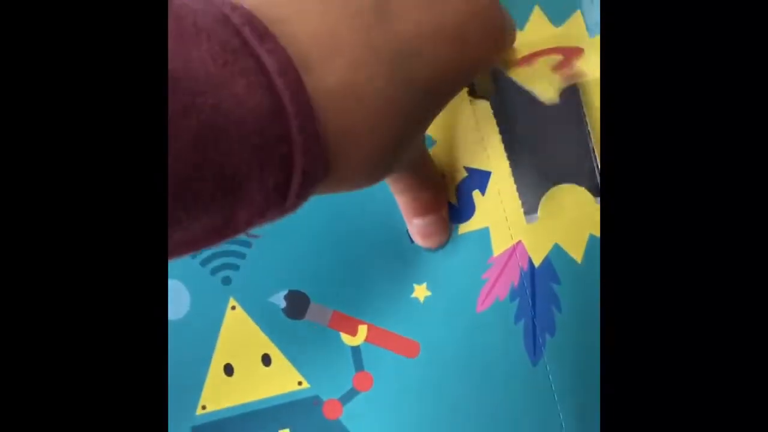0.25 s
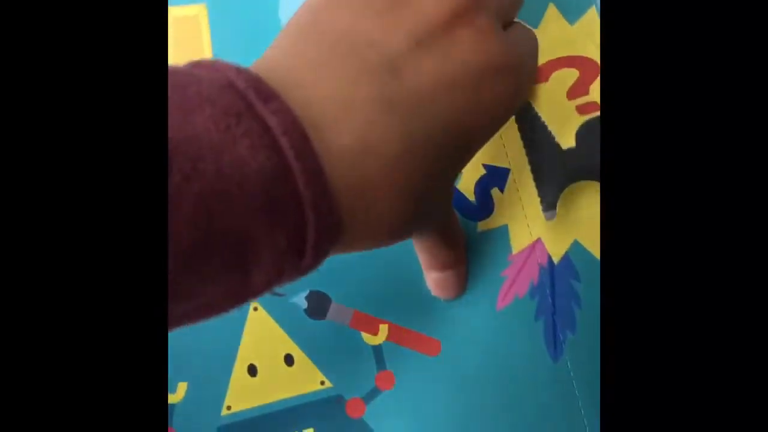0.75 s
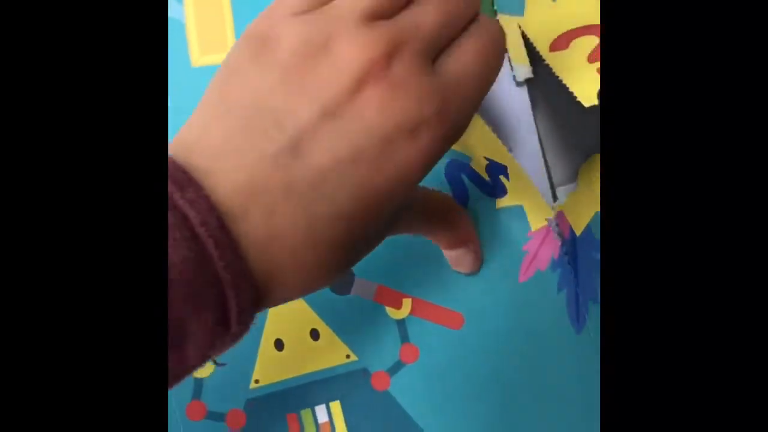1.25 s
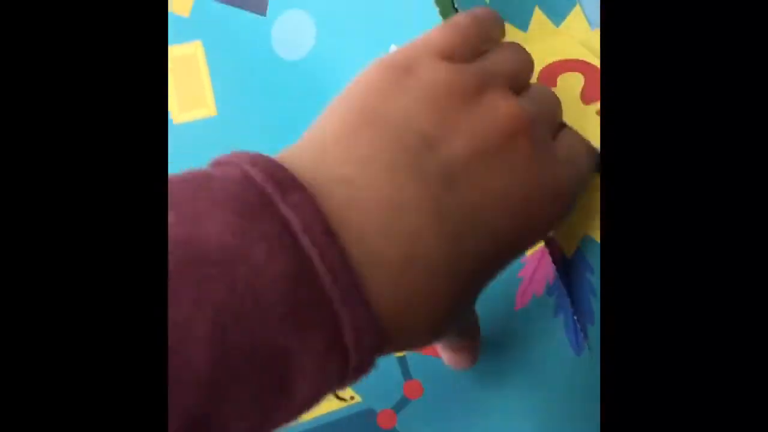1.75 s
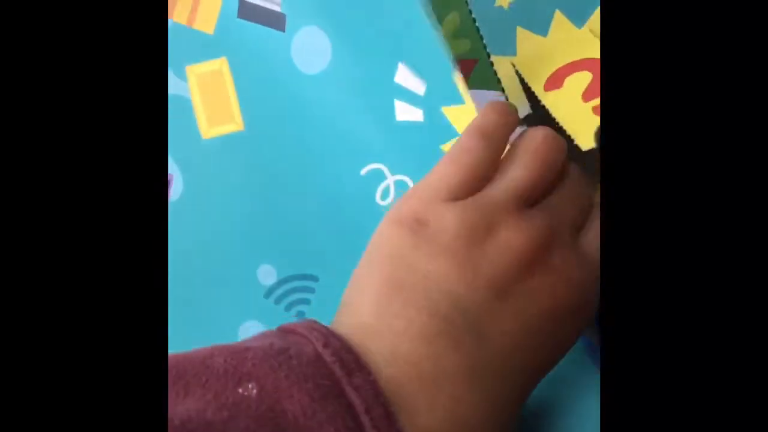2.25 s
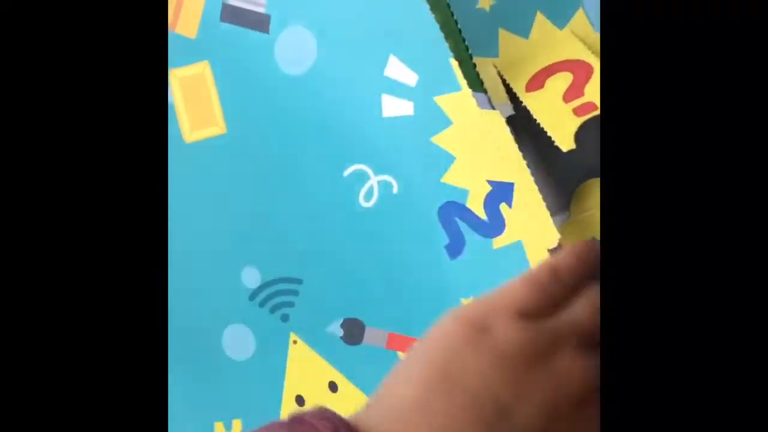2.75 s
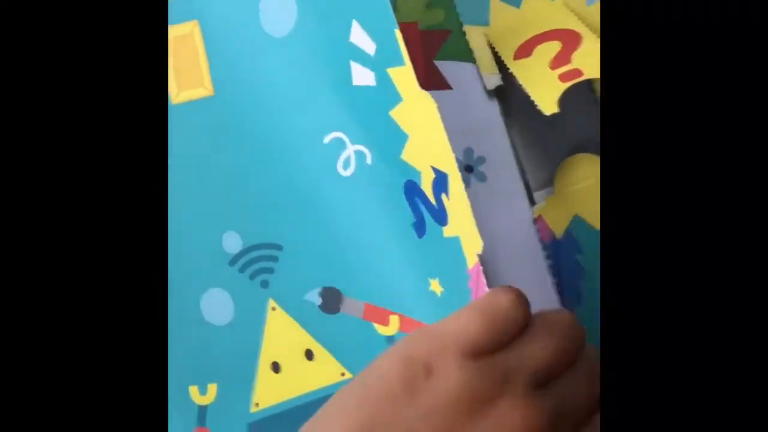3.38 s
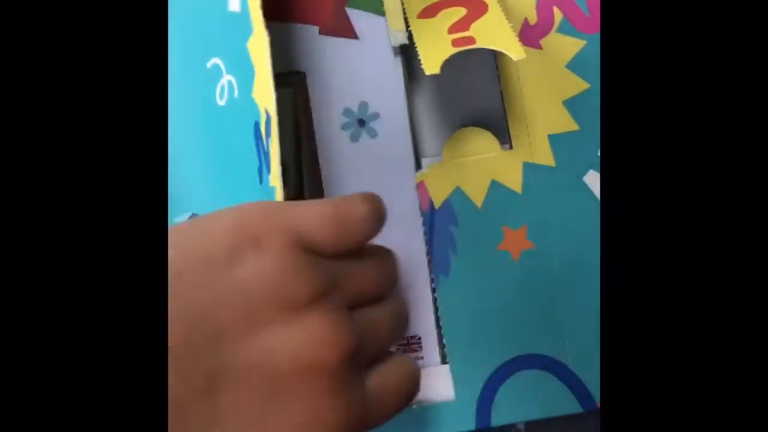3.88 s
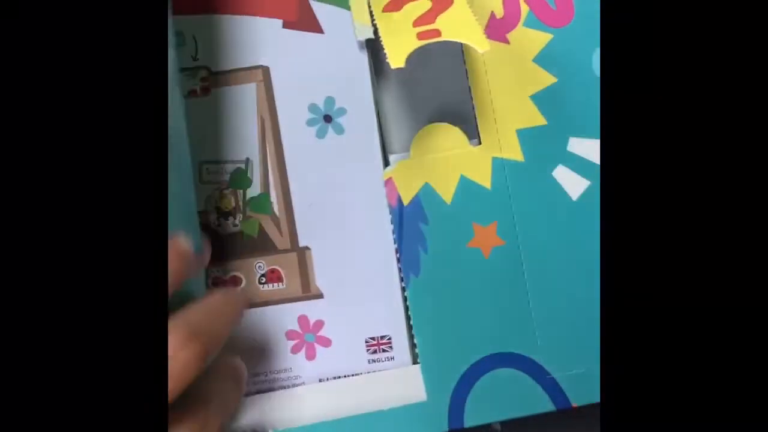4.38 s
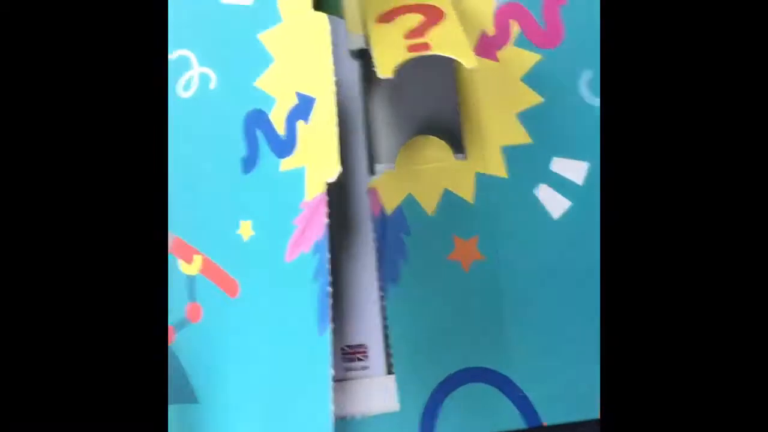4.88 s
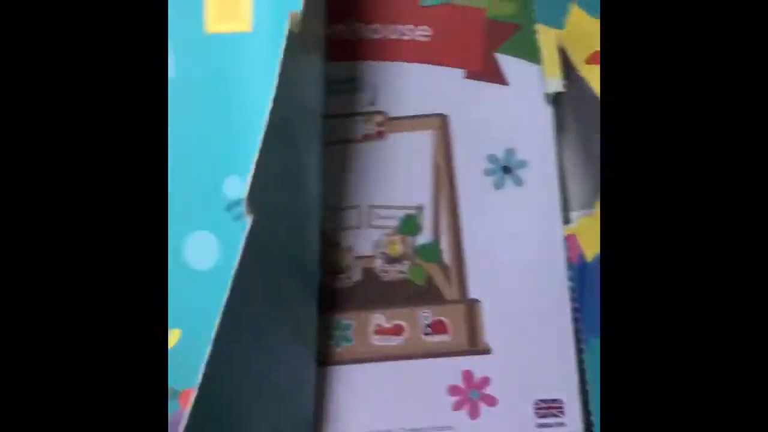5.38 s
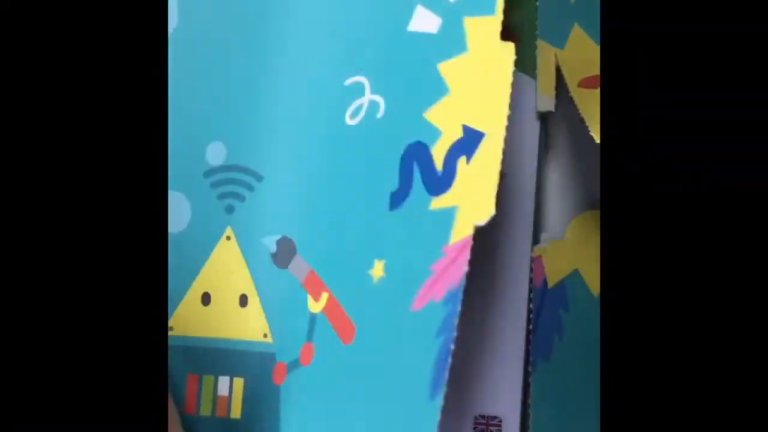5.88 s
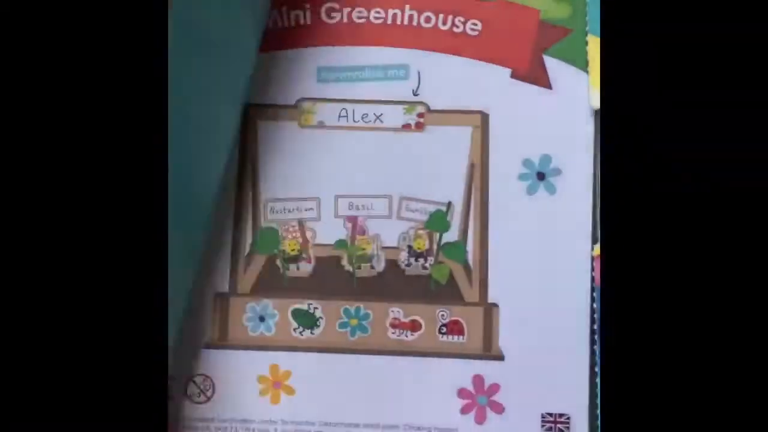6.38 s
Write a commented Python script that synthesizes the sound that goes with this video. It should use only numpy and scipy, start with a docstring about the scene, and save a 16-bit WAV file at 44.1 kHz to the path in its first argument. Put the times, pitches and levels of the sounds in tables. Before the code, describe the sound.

In a quiet room, a hand tears a thin cardboard flap along its perforated edge. Dry snaps come in tight irregular clusters, some bright and crackly, others duller with a hollow box knock. Faint sliding and rustling of card fills the gaps, with short near-silences. Later the flap is bent and moved with more rustle and brisk snapping. A small close microphone gives a thin sound with little bass.

```python
"""Quiet room, small close microphone: thin printed card is torn by hand along a perforation over a hollow box.
Snaps: short noise bursts for breaking fibres, ringing flap and panel resonances and thumping the box modes.
Rubbing: uneven noise grains in bands for sliding fingers, creaks before snaps, rustles after; pulls jolt the box.
Room: a short noise tail on the snaps, dying band by band."""
import sys
import numpy as np
from scipy import signal
from scipy.io import wavfile
from scipy.ndimage import uniform_filter1d

SR = 44100
rng = np.random.default_rng(int(sys.argv[2]) if len(sys.argv) > 2 else 0)


def int16_out(signal):
    """Quantize to a 16-bit WAV file."""
    q = np.round(np.clip(np.atleast_2d(signal).T, -1, 1) * 32767)
    wavfile.write(sys.argv[1], SR, q.astype(np.int16))


def level_to_linear(level):
    """Convert decibel levels to linear amplitude factors, elementwise."""
    exponent = np.asarray(level, float) / 20
    return 10 ** exponent


N = 292383  # samples

# bridges and creases snapping; level and treble relative, duration includes ringing:
# start_s, level_db, flap_pitch_hz, duration_ms, treble_db
SNAP_EVENTS = [(0.063, -14.5, 3940, 2.4, -5), (.169, -23.5, 3100, 7.1, -4.5),
               (0.2354, -2.5, 1360, 4.8, -14), (0.2581, -3.5, 2800, 2.7, -9), (0.2632, -10, 3980, 3.1, -6),
               (0.269, -16, 4000, 6.5, -7), (0.297, -19, 5430, 3.4, -8), (0.4091, -18.5, 5360, 3.3, -5.5),
               (.6084, -41, 1940, 15, -14), (0.6487, -44, 1700, 1.2, -13), (0.6662, -36, 970, 4, -20),
               (.8947, -50, 4090, 6.7, -15.5), (.9284, -49, 3120, 9.4, -20),
               (.9648, -13.5, 3000, 3.4, -4.5), (0.9876, -17, 3000, 4.8, -3), (0.9937, -10, 6240, 1.3, -16),
               (0.9969, -7, 2830, 4.1, -1), (1.014, -8.5, 3900, 1.24, -1), (1.03, -11, 4000, 3.8, -5),
               (1.2001, -26.5, 1260, 2, 0), (1.2123, -9, 2810, 1.7, -7), (1.3172, -17.5, 1150, 2.5, 2),
               (1.323, -8, 1310, 2.26, -4), (1.349, -13.5, 1160, 4.4, 3.5), (1.4143, -34, 5370, 4.9, -8),
               (1.4731, -20.5, 3000, 3.1, 1), (1.484, -47, 7300, 3.3, 18), (1.4908, -32.5, 5400, 6.4, -1),
               (1.548, -27.5, 2000, 1.2, -21), (1.5643, -17, 2620, 3.66, -15), (1.6952, -30, 3510, 4.6, -5),
               (1.708, -16.5, 3470, 2.8, -11), (1.7368, -6, 1440, 4.6, -19.5),
               (1.9188, -34.5, 1190, 2.1, -20), (1.997, -33, 5700, 2.2, -22), (2.0245, -34, 2420, 4.3, -16),
               (2.0688, -34, 2370, 3.7, -5), (2.0816, -25, 3840, 2.3, -20), (2.0897, -28, 1960, 1.03, -14),
               (2.1022, -31.5, 1940, 2.2, -14), (2.1197, -29, 1990, 3, -14), (2.149, -27, 1920, 3.3, -16),
               (2.1753, -28.5, 1990, 2.9, -12), (2.195, -18.5, 3230, 2.8, -8), (2.1982, -8, 3350, 1.8, -8),
               (2.2285, -20, 2500, 4.4, -19), (2.2437, -17.5, 4170, 6.9, -7), (2.25, -11, 6500, 1.1, -24),
               (2.2569, -4.5, 1050, 3.9, -14), (2.4766, -29, 1860, 1.3, -22), (2.5069, -3, 2550, 5.4, -20),
               (2.5162, -5.5, 2340, 5, -17), (2.5239, -15, 1060, 1.8, -18), (2.6016, -37, 1960, 3.9, -10),
               (2.6702, -18.5, 1750, 2, -22), (2.7633, -26, 1590, 1, -24), (2.886, -48, 1640, 1.5, -42),
               (2.9183, -63, 1330, 1.9, -33.5), (2.929, -39, 1320, 5, -30),
               (2.9468, -40.5, 1660, 3.25, -15.5), (2.974, -21, 1440, 6.7, -15),
               (2.992, -19.5, 3490, 2.2, -4.5), (3.0313, -10, 1435, 5, -22), (3.0374, -8, 1320, 2.84, -14),
               (3.0555, -7, 3300, 1.58, -13), (3.1588, -26, 1290, 2.33, -20), (3.2961, -5, 3560, 2.41, -21),
               (3.303, -6, 3430, 3.1, -11.5), (3.3101, -10.5, 1430, 2.4, -15),
               (3.3368, -7, 1440, 4.5, -19.5), (3.6569, -36.5, 2080, 5.3, -5.5),
               (3.7495, -16, 2260, 1.3, -21), (3.781, -2, 2010, 1.66, -15), (3.8033, -7.5, 1520, 4.2, -13),
               (3.8185, -3.5, 1520, 2.7, -25), (3.8603, -10.5, 3550, 3.1, -7),
               (3.8812, -7, 1580, 4.1, -15.5), (3.9174, -15, 1320, 3.9, -9),
               (4.0453, -8.5, 1390, 1.92, -12.5), (4.12, -16, 1530, 3.7, -17.5),
               (4.3279, -15.5, 3500, 1.3, -3.5), (4.4155, -28.5, 2230, 2.3, -16),
               (4.4255, -26.5, 2560, 6.4, -22), (4.5316, -28, 3600, 29, -22), (4.5482, -25, 4800, 11, -6),
               (4.6421, -39, 3380, 21, -15), (4.715, -15.5, 4140, 6.2, -12),
               (4.8223, -35.5, 2110, 4.8, -28), (4.8824, -23, 2070, 12, -26.5),
               (4.8877, -25.5, 1730, 8.1, -57), (5.0713, -40.5, 1530, 1.7, -41),
               (5.0875, -37.5, 1550, 6, -40), (5.098, -37, 1380, 3.5, -21.5), (5.1116, -43, 1590, 3.4, -20),
               (5.129, -38.5, 1210, 3.5, -12), (5.1378, -44, 1570, 10, -11),
               (5.1678, -13.5, 3900, 4.8, -4.5), (5.2077, -18, 4560, 5.7, -14),
               (5.248, -17.5, 3700, 8.1, -16), (5.303, -15.5, 3160, 3.9, -14),
               (5.3184, -13.5, 3500, 2.3, -4), (5.375, -17, 3240, 9.5, -3), (5.4347, -9, 1830, 2.15, -19),
               (5.524, -21, 3470, 1.3, -23), (5.694, -32.5, 1340, 3.5, -16),
               (5.9083, -18, 2550, 4.4, -18.5), (5.958, -22, 2870, 1.2, -1), (5.9697, -12, 2580, 3.3, -11),
               (5.9864, -5, 2540, 1.72, -9), (6.0058, -15, 4300, 3.1, -14), (6.0226, -12.5, 4170, 7.7, -12),
               (6.0515, -15.5, 3680, 1.4, -8), (6.1138, -10.5, 6500, 1.95, -10),
               (6.1215, -9.5, 1600, 2.6, -19), (6.146, -23.5, 1620, 3.5, -2), (6.1675, -27, 1670, 6, -8),
               (6.1949, -19.5, 880, 5, -10), (6.211, -2, 1300, 3.15, -8), (6.3723, -21.5, 5740, 7.1, -5),
               (6.3831, -19, 3980, 9.9, -2), (6.4057, -10.5, 8100, 2.4, -9), (6.41, -12.5, 1620, 3.7, 0.5),
               (6.4254, -12.5, 2800, 4.1, -18), (6.4337, -7, 3950, 2.55, -5.5),
               (6.4461, -15, 1720, 2.5, -2), (6.5074, -23, 3770, 6.6, -4), (6.5129, -18.5, 2060, 1.56, -6),
               (6.5339, -9, 1960, 2.9, -10), (6.5466, -14.5, 1980, 6.2, -13), (6.5606, -10, 1740, 2, -1)]
# hollow box modes, relative level: centre_hz, width_hz, level_db
BOX_MODES = [(110, 77, -9.5), (195.6, 30.4, 1), (285.5, 37, -0.5), (347, 66, 0.5), (493, 31, 2),
             (551.3, 38.6, 2.5), (672.7, 36, 5.5)]


def rms_one(x):
    """Scale to unit rms."""
    return x / np.sqrt(np.mean(x ** 2) + 1e-20)


def peak_one(x, span):
    """Scale so that the loudest stretch of span samples has unit power."""
    return x / np.sqrt(uniform_filter1d(x ** 2, span).max() + 1e-20)


def at_hz(points, hz, column):
    """Read a table column along log frequency."""
    table = np.array(points)
    return np.interp(np.log(hz), np.log(table[:, 0]), table[:, column])


def resonance(x, hz, width_hz):
    """Two-pole resonance with about unit gain at its centre."""
    r = np.exp(-np.pi * np.clip(width_hz, 5, 5000) / SR)
    gain = (1 - r * r) / 2
    return signal.lfilter([gain, 0, -gain], [1, -2 * r * np.cos(2 * np.pi * hz / SR), r * r], x)


def body(x, modes, extra_db):
    """Parallel resonances of a solid, signs alternating, each with an extra level."""
    total = np.zeros(len(x))
    for k, (hz, width_hz, level_db) in enumerate(modes):
        total += (-1) ** k * level_to_linear(level_db + extra_db[k]) * resonance(x, hz, width_hz)
    return total


def band(x, low_hz, high_hz):
    """Butterworth band-pass."""
    sos = signal.butter(2, [low_hz, min(high_hz, .45 * SR)], "band", fs=SR, output="sos")
    return signal.sosfilt(sos, x)


def drift(rate_hz):
    """Random wander of unit rms: noise through a two-pole low-pass."""
    r = np.exp(-2 * np.pi * rate_hz / SR)
    noise = rng.standard_normal(N + SR)
    return rms_one(signal.lfilter([1], [1, -2 * r, r * r], noise)[SR:])


def swell(t, start, length, rise_db_per_s, fall_db_per_s):
    """Relative level in dB that rises to start, holds for length and falls."""
    rise = rise_db_per_s * np.maximum(start - t, 0)
    fall = fall_db_per_s * np.maximum(t - start - length, 0)
    return -rise - fall


def snaps():
    """Fibres break in a noise burst: bright crack, ringing flap and panel, thump of the box modes."""
    # card panel modes, relative level: centre_hz, width_hz, level_db
    panel_modes = [(1127, 227, 3.5), (1500, 440, 2.5), (2000, 460, 3), (2648, 410, 6), (3300, 550, 5),
                   (4750, 1250, 5), (5350, 1030, 8), (6500, 2800, 4.5)]
    size, lead = 4096, 512  # samples per snap, samples ahead of the break
    out = np.zeros(N + size)
    t = (np.arange(size) - lead) / SR
    after = np.maximum(t, 0)
    fibres = rng.standard_normal((len(SNAP_EVENTS), size))
    spread = rng.standard_normal((len(SNAP_EVENTS), len(panel_modes) + len(BOX_MODES)))
    for (start_s, level_db, hz, duration_ms, treble_db), noise, luck in zip(SNAP_EVENTS, fibres, spread):
        burst_s = max(duration_ms - 1.2, .3) / 1000  # ringing makes up the rest
        onset = 1 - np.exp(-after / (0.15 * burst_s))
        burst = noise * onset * np.exp(-(after / (0.8 * burst_s)) ** 2)
        # main bridge parts in one jolt, softer in a long tear
        burst[lead + round(.3 * burst_s * SR)] += 4.66 * np.exp(-burst_s / 0.0046)

        # first fibres give way early, loose ones crackle on
        capped_s = min(burst_s, .006)
        early = level_to_linear(-30 + 1400 * capped_s) * np.exp(-abs(t) / (0.0014 + 0.23 * capped_s))
        late = level_to_linear(-12.0) * np.exp(-after / 0.0062)
        source = burst + noise * np.where(t < 0, early, late)

        flap = peak_one(resonance(burst, hz, .14 * hz), 44)
        # a soft break leaves the high modes quiet and muffles the ring
        dull_db = 0.065 * min(treble_db + 3.0, 0) * np.arange(len(panel_modes))
        panel_extra_db = 2.8 * luck[:len(panel_modes)] + dull_db
        panel = peak_one(body(source, panel_modes, panel_extra_db), 44)
        flap_db = -5.0 - 0.35 * min(treble_db, -2)
        ring = peak_one(level_to_linear(flap_db) * flap + panel, 44)
        top_hz = np.clip(hz * 1.6 + 9000 * level_to_linear(0.78 * (treble_db + 9.5)), 500, 18000)
        ring = signal.sosfilt(signal.butter(2, top_hz, fs=SR, output="sos"), ring)

        crack = peak_one(band(source, 4500, 14000), 44)
        box = body(source, BOX_MODES, 2.0 * luck[len(panel_modes):])
        thump = peak_one(band(box, 190, 900), 200)
        # relative to the snap: weak snaps thump relatively more, high flaps less
        thump_db = -23.5 - 0.22 * level_db - 2 * np.log2(hz / 2000)

        snap = ring + level_to_linear(treble_db) * crack + level_to_linear(thump_db) * thump
        first = round((start_s - .0004) * SR) - lead
        out[first:first + size] += level_to_linear(level_db - 2.0) * snap
    return out[:N]


def rubbing():
    """Dense uneven grains of friction, patchy band by band, and the rumble of the handled box."""
    # friction colour, relative level: centre_hz, level_db
    colour = [(410, -34), (700, -1), (852, -10), (1480, -2), (1750, -4), (4050, -10.5), (5760, -13),
              (10300, -22.5), (15200, -24.5), (16000, -34.5)]
    *friction_gains, deep_gain, upper_gain = handling()
    grip = level_to_linear(1.4 * drift(60))  # uneven grip of the skin
    grains = rng.standard_normal((2, N)) * level_to_linear(3.3 * np.minimum(rng.exponential(1, (2, N)), 5))
    edges_hz = 700 * 2 ** np.arange(0, 4.8, .25)
    ranges = np.zeros((3, N))  # low, middle, treble
    for k, (low_hz, high_hz) in enumerate(zip(edges_hz, edges_hz[1:])):
        hz = np.sqrt(low_hz * high_hz)
        patchy_db = 2.0 * drift(4) + 1.88 * drift(25)
        part = level_to_linear(at_hz(colour, hz, 1) + patchy_db) * band(grains[k % 2], low_hz, high_hz)
        ranges[np.searchsorted([2800, 5600], hz)] += part
    shove = rng.standard_normal(N) * level_to_linear(2.5 * drift(14))
    deep = rms_one(body(shove, BOX_MODES[:3], np.zeros(3)))
    upper = rms_one(body(shove, BOX_MODES[3:], np.zeros(4)))
    friction = sum(gain * rms_one(grip * part) for gain, part in zip(friction_gains, ranges))
    return friction + deep_gain * deep + upper_gain * upper


def handling():
    """Gain of each rubbing layer: strokes, creak before and rustle after each snap, box jolts; powers add."""
    # fingers and flap sliding over the card, relative levels:
    # start_s, length_s, level_db, brightness_db, box_weight_db
    strokes = [(-.02, 0.016, -53.5, -5, 4), (.08, .08, -56, 0, -9), (.18, .04, -55, 9, -5),
               (0.342, 0.2, -48.5, -5.5, -19), (.61, .06, -58, -17, -2), (.68, 0.066, -61.5, -39.5, -1.5),
               (0.861, .04, -62, -18, -2.5), (0.933, 0.037, -52.5, -3, -12.5), (1.063, .12, -54, 3, -24),
               (1.24, 0.15, -57, -5, 0), (1.372, 0.092, -51, 3, -15), (1.554, .11, -49.5, 7.5, -13),
               (1.672, 0.07, -41.5, 5.5, -19), (1.884, 0.19, -54, -7, -7.5), (2.067, 0.18, -61, 4, -10),
               (2.337, 0.064, -52.5, -9, -8), (2.406, .08, -53.5, -7, -16), (2.583, 0.077, -49, -6, -1.5),
               (2.694, 0.069, -43, -4.5, -12.5), (2.823, 0.3, -60, -28, -16.5), (3.094, 0.077, -58, -5, -9),
               (3.196, 0.046, -63.5, -21, -15), (3.27, 0.027, -70, -8, -15), (3.384, 0.2, -44.5, -0.5, -19),
               (3.608, .12, -49.5, -3, -14.5), (3.8, 0.14, -36.5, -23, -10), (3.985, 0.056, -50.5, -5, -12),
               (4.076, 0.15, -48.5, -2, -9), (4.29, 0.17, -50, 2, 0), (4.523, 0.047, -45, 2.5, -7),
               (4.662, 0.083, -44.5, -6.5, -11.5), (4.725, 0.12, -52, -3.5, 0.5),
               (4.885, 0.025, -39.5, -17, -13), (4.949, 0.06, -52, -8, -10), (5.06, .08, -55.5, -24, -4.5),
               (5.166, 0.25, -42, 3, -5.5), (5.441, .1, -40.5, 2.5, -16), (5.559, .04, -52.5, 3, -14),
               (5.612, 0.12, -46, -6, -11), (5.725, 0.15, -49, 1, -11), (5.959, 0.098, -41.5, 9, -25),
               (6.134, 0.1, -33.5, 0, -16), (6.28, 0.066, -43, -7, -12), (6.388, 0.053, -32, 1.5, 0),
               (6.468, .05, -50, 8, -1), (6.54, .12, -33, 2, -1)]
    # pulls that boom the box: start_s, deep_modes_db, upper_modes_db
    jolts = [(.066, -47, -64), (0.236, -29.5, -35.5), (.61, -55, -48.5), (0.968, -48.5, -47.5),
             (1.324, -50, -33.5), (1.74, -52, -44), (2.2, -60, -38.5), (2.257, -32.5, -41),
             (2.512, -41, -35), (3.035, -39.5, -41.5), (3.301, -56, -50), (3.79, -43, -36),
             (3.878, -31, -33), (4.328, -40, -45), (4.719, -38, -36.5), (4.885, -56, -59),
             (5.17, -42.5, -59), (5.99, -55, -34.5), (6.21, -46, -38), (6.39, -28, -50), (6.43, -28, -50),
             (6.56, -35, -50)]
    # per-layer lists: low, middle, treble friction, deep and upper box modes
    # stroke offset: offset_db
    stroke_db = [1.5, 3, -0.5, -1.5, -12.5]
    # parts of the brightness and box weight taken up: db_per_db
    takes_brightness = [0, 0.47, 0.72, 0, 0]
    takes_weight = [0.19, 0.26, 0.29, 1, 0]
    # torn fibres and freed flap, level relative to the snap: level_db; fall: db_per_s; treble share: db_per_db
    rustle_db = [-31.5, -28.5, -22, -43, -45]
    rustle_fall_db_per_s = [200, 197, 220, 154, 170]
    rustle_takes_treble = [0, 0.13, .9, 0, 0.076]
    # extra loss of very soft contacts, below -20.5 dB brightness: db_per_db
    soft_loss = [0, 1, 0.096, 0, 0]
    # multiplier on the stroke fall rate: factor
    fall_factor = [1.01, 1.6, 1.4, 1.1, 0.76]

    t = np.arange(0, N + 64, 64)[:, None] / SR
    start_s, length_s, level_db, bright_db, weight_db = np.transpose(strokes)
    snap_s, snap_db, _, _, treble_db = np.transpose(SNAP_EVENTS)
    jolt_s, *jolt_levels_db = np.transpose(jolts)
    jolt = level_to_linear(swell(t, jolt_s, 0, rise_db_per_s=1500.5, fall_db_per_s=201.5))
    boom_powers = [0, 0, 0] + [np.sum((level_to_linear(db) * jolt) ** 2, axis=1) for db in jolt_levels_db]
    creak_db = -8 * (t < snap_s)  # the card is loaded before a snap
    gains = []
    for k, boom_power in enumerate(boom_powers):
        slide_db = stroke_db[k] + level_db + swell(t, start_s, length_s, 611, fall_factor[k] * 247)
        slide_db = slide_db + takes_brightness[k] * bright_db + takes_weight[k] * weight_db
        slide_db = slide_db + soft_loss[k] * np.minimum(bright_db + 20.5, 0)
        fibre_db = rustle_db[k] + snap_db + rustle_takes_treble[k] * treble_db + creak_db
        fibre_db = fibre_db + swell(t, snap_s, 0, 903, rustle_fall_db_per_s[k])
        power = np.sum(level_to_linear(slide_db) ** 2, axis=1) + np.sum(level_to_linear(fibre_db) ** 2, axis=1) + boom_power
        gains.append(np.interp(np.arange(N) / SR, t[:, 0], np.sqrt(power)))
    return gains


def room(x):
    """Diffuse tail: noise that builds up over about a millisecond and dies band by band."""
    # reverberation: centre_hz, t60_s, level_db
    tail_bands = [(200, 0.12, -13.5), (473, 0.19, -17.5), (1200, 0.18, -7), (2800, 0.25, -10.5),
                  (5900, 0.32, -12), (13000, 0.13, -31)]
    t = np.arange(SR // 2) / SR
    edges_hz = 100 * 2 ** np.arange(0, 8, .5)
    tail = np.zeros(len(t))
    for low_hz, high_hz in zip(edges_hz, edges_hz[1:]):
        hz = np.sqrt(low_hz * high_hz)
        t60_s = np.clip(at_hz(tail_bands, hz, 1), .05, 1)
        dying = rng.standard_normal(len(t)) * level_to_linear(-60 * t / t60_s)
        dying *= 1 - np.exp(-(t / 0.0011) ** 2)
        dying /= np.sqrt(np.sum(dying ** 2))
        tail += level_to_linear(at_hz(tail_bands, hz, 2)) * band(dying, low_hz, high_hz)
    return signal.fftconvolve(x, tail)[:N]


def scene():
    """Snaps with their room tail over the rubbing."""
    torn = snaps()
    return (torn + room(torn) + rubbing())[None]


def suppress(x, floor_db):
    """Noise suppressor: every frequency cell that sinks towards a fixed floor is turned down."""
    cells = signal.stft(x, nperseg=1024)[2]
    power = uniform_filter1d(abs(cells) ** 2, size=5, axis=-2) + 1e-20  # smoothed over frequency
    keep = np.clip(1 - level_to_linear(floor_db) ** 2 / power, .02, 1)
    return signal.istft(cells * keep, nperseg=1024)[1][..., :N]


def roll_off(x):
    """The treble ends steeply here."""
    return signal.sosfilt(signal.butter(12, 16960, fs=SR, output="sos"), x)


def record(dry):
    """Small microphone without bass, noise suppressor, rounded peaks, cut top."""
    thin = signal.sosfilt(signal.butter(3, 140, "high", fs=SR, output="sos"), dry)
    clean = suppress(thin, floor_db=-102.5)
    rounded = clean / (1 + abs(clean / .9) ** 4) ** .25
    cut = signal.sosfilt(signal.cheby2(12, 60, 17000, fs=SR, output="sos"), rounded)
    mix = signal.sosfilt(signal.butter(1, 90, "high", fs=SR, output="sos"), cut)
    return roll_off(mix)


dry = scene()
out = record(dry)
int16_out(out)
```